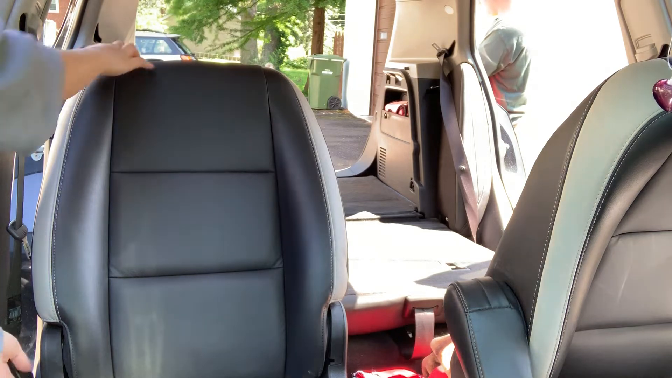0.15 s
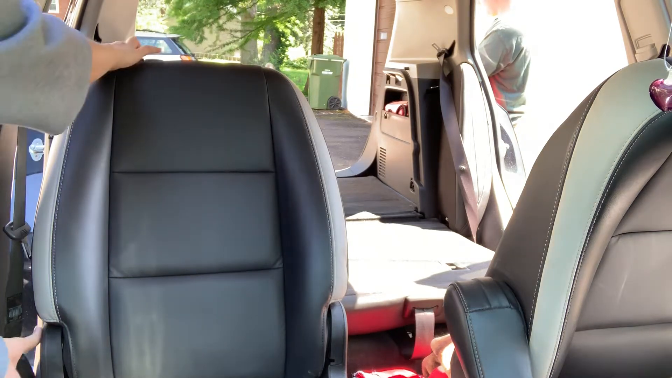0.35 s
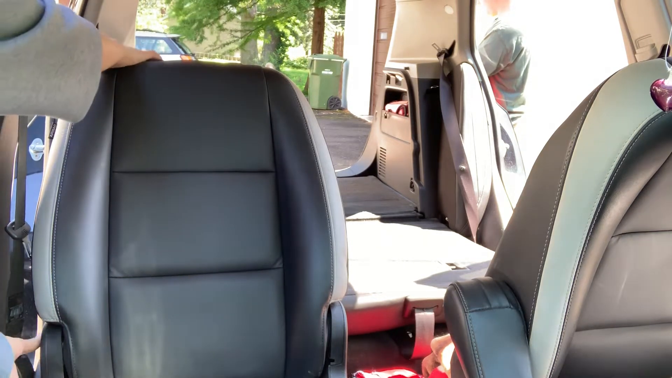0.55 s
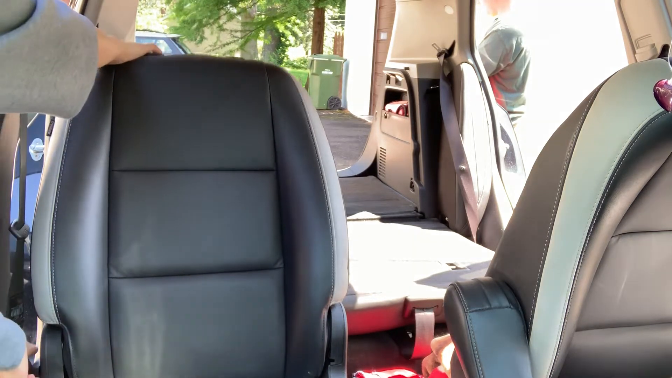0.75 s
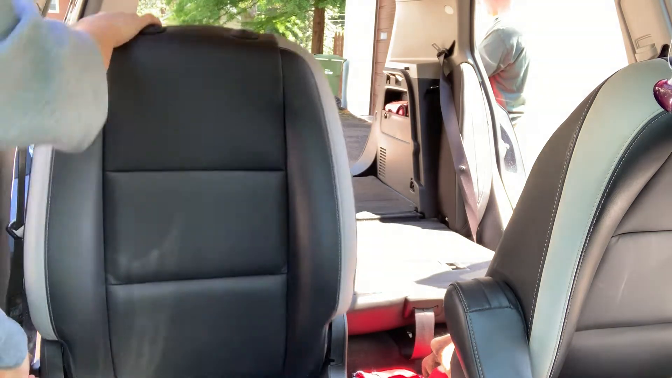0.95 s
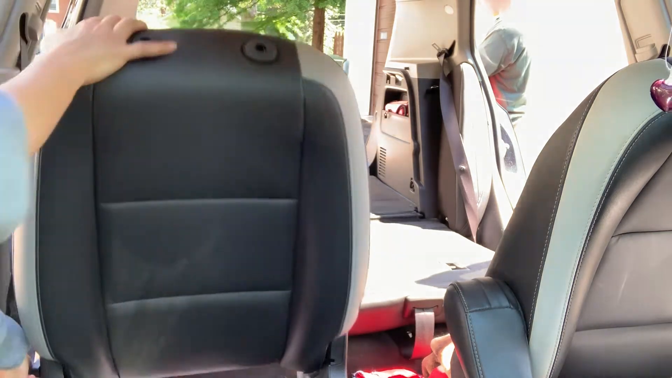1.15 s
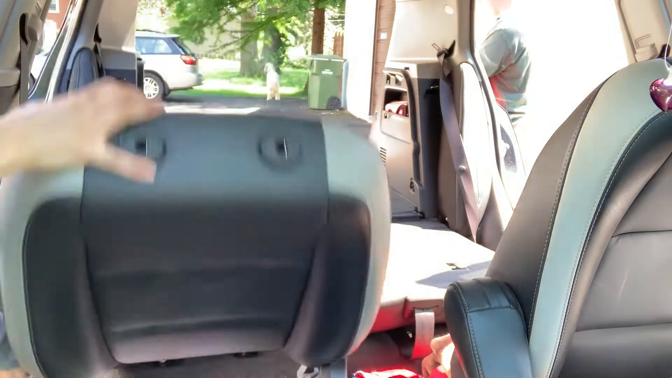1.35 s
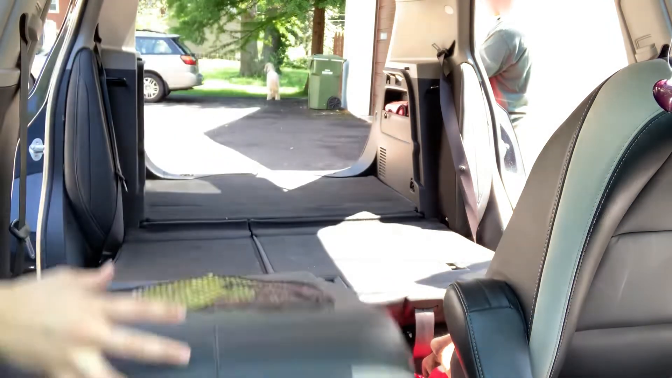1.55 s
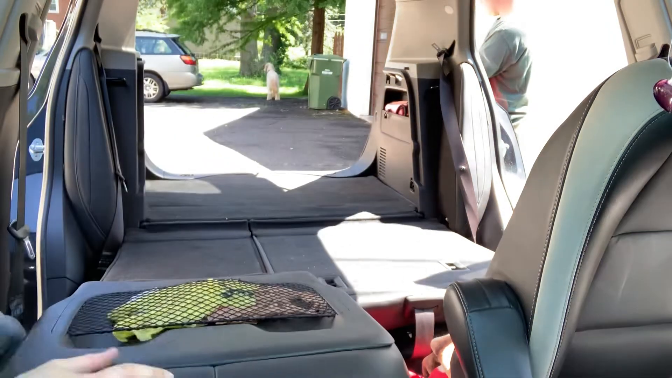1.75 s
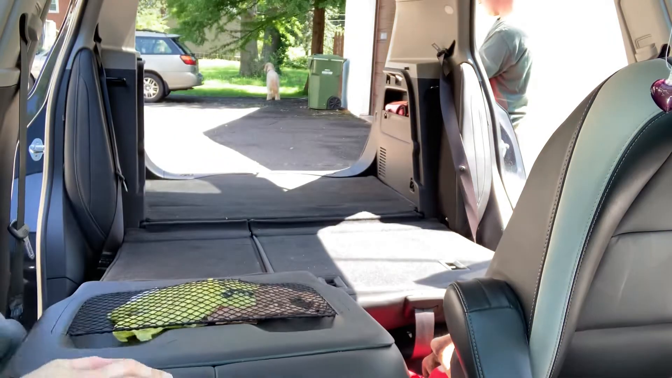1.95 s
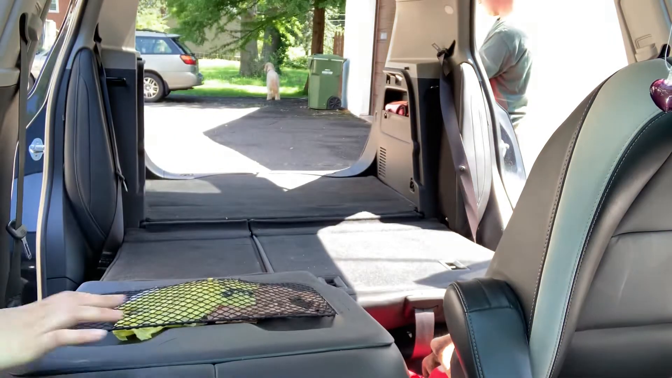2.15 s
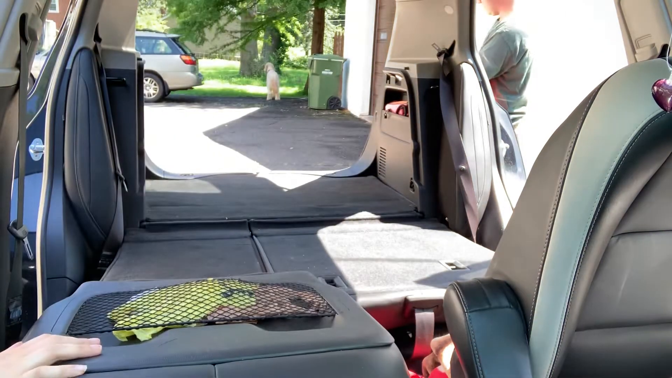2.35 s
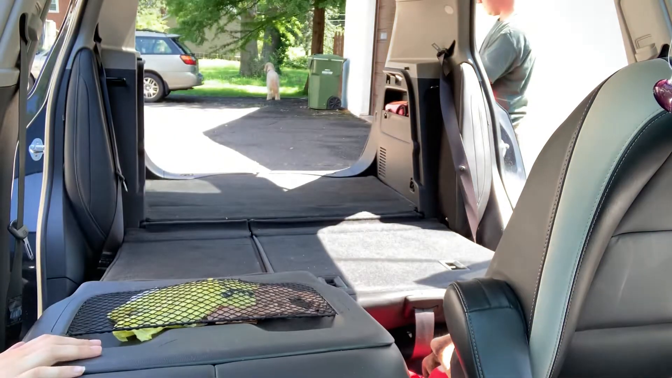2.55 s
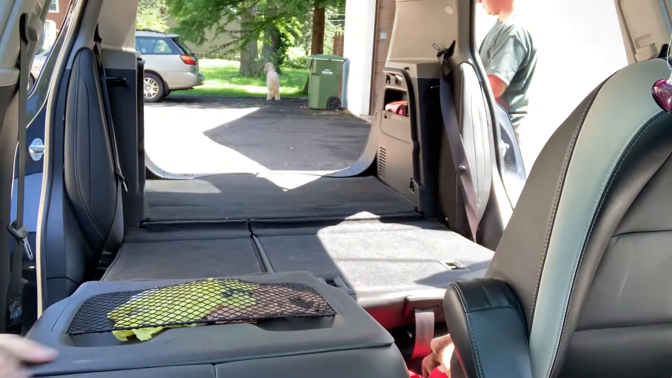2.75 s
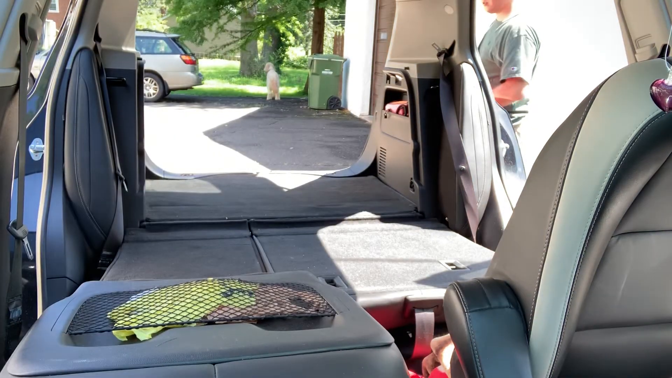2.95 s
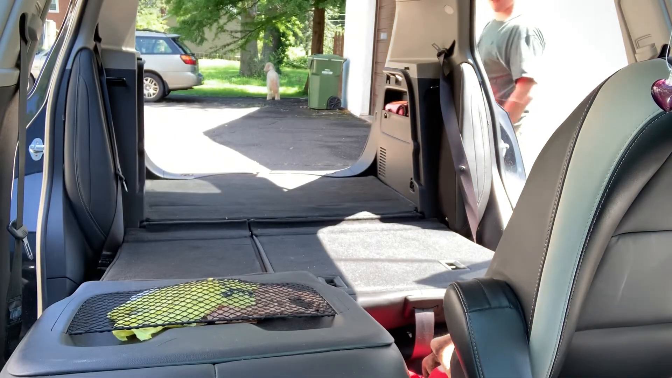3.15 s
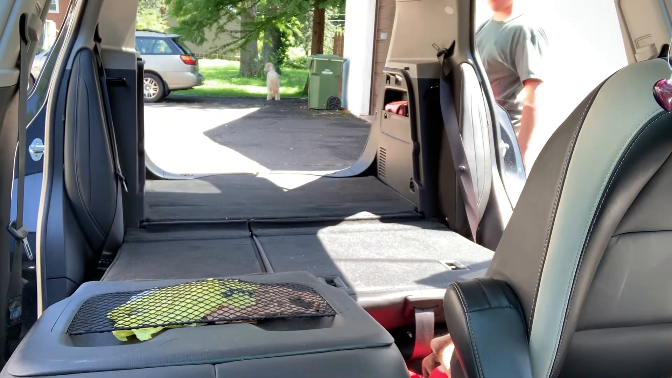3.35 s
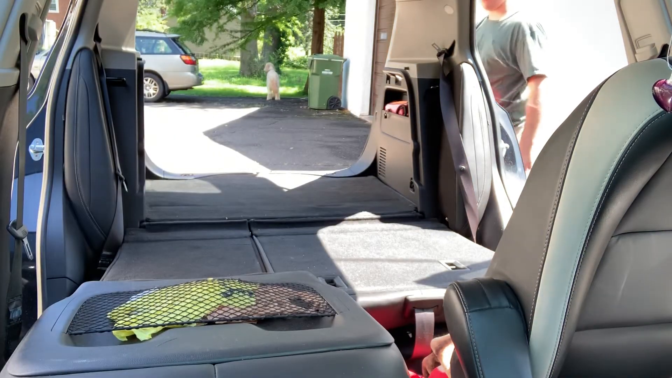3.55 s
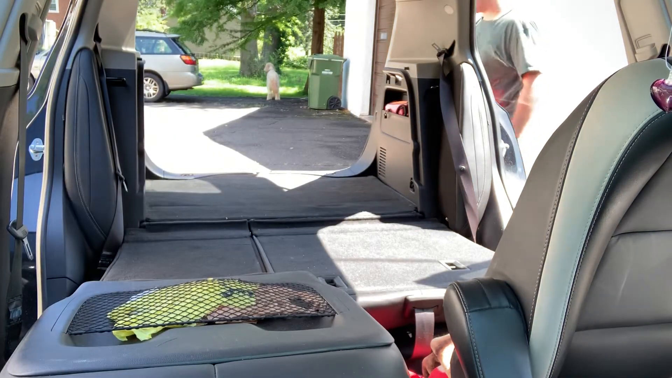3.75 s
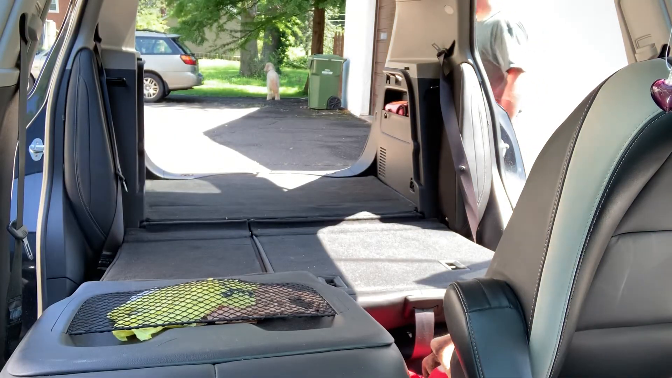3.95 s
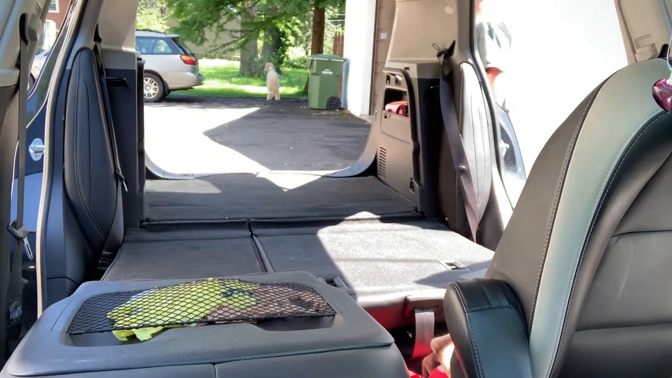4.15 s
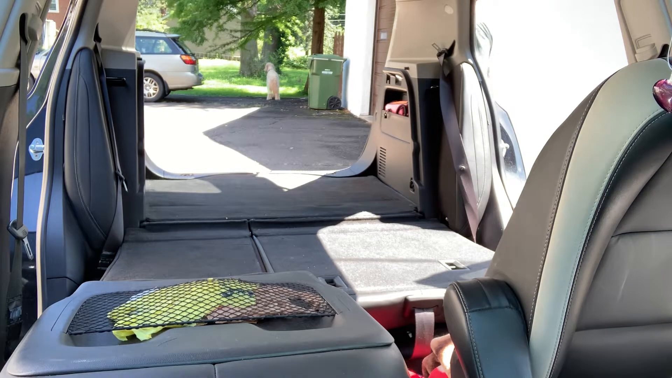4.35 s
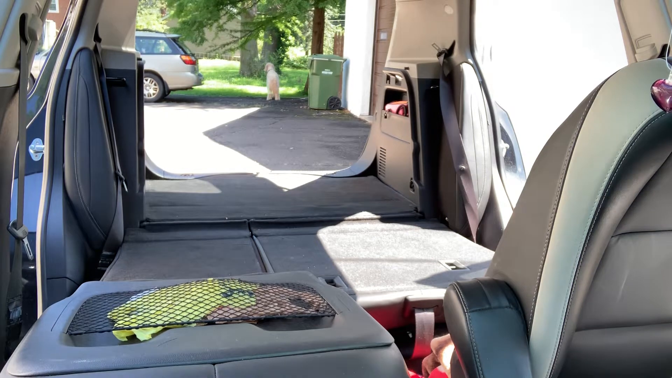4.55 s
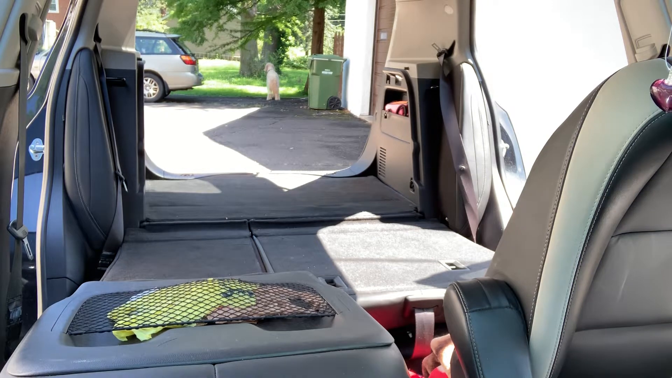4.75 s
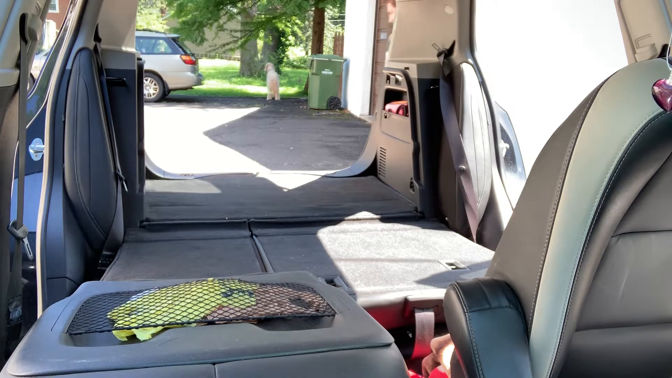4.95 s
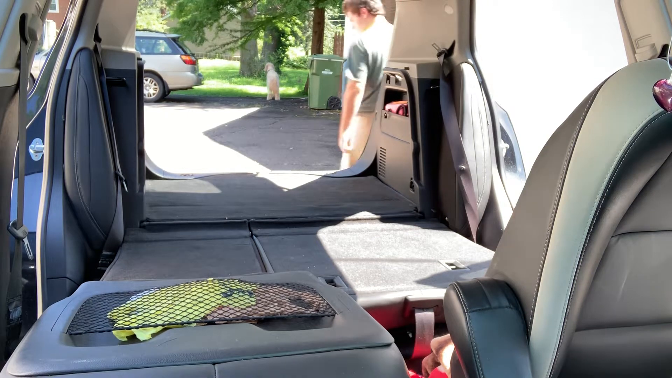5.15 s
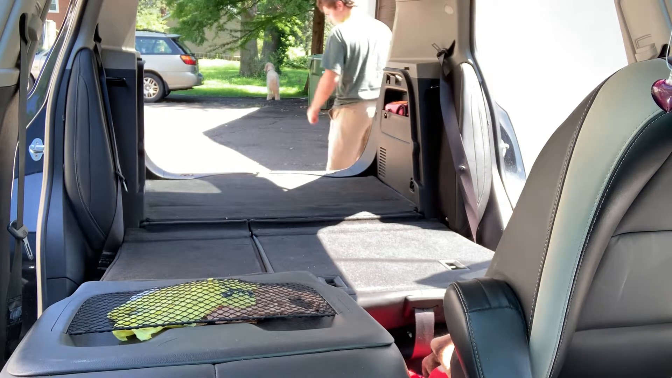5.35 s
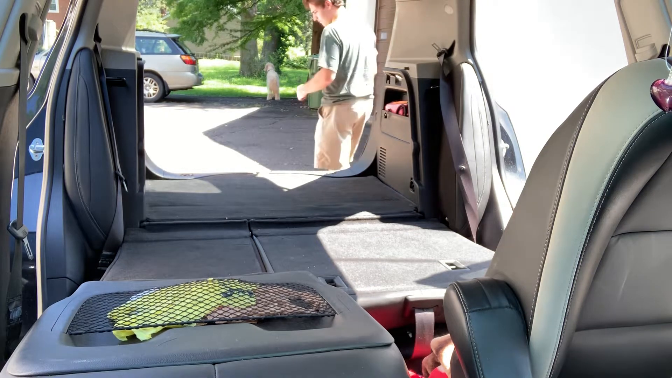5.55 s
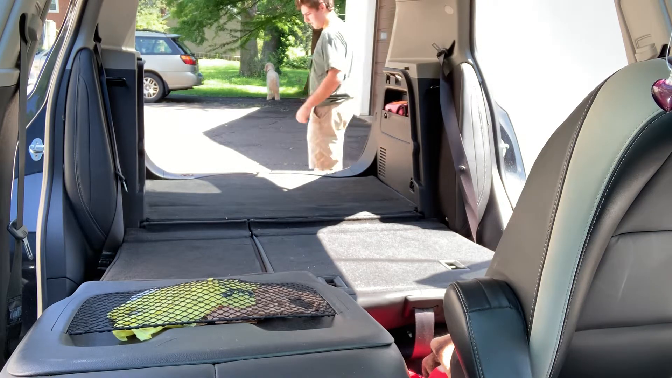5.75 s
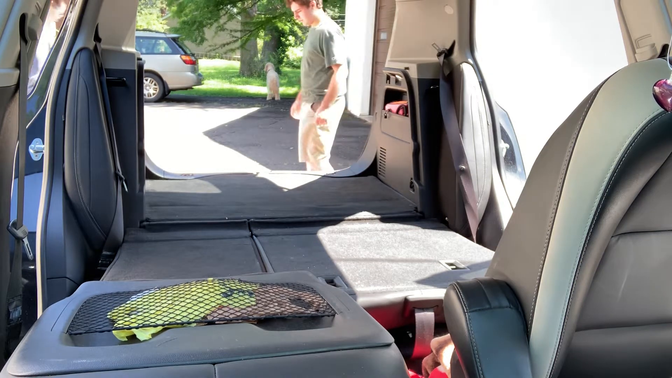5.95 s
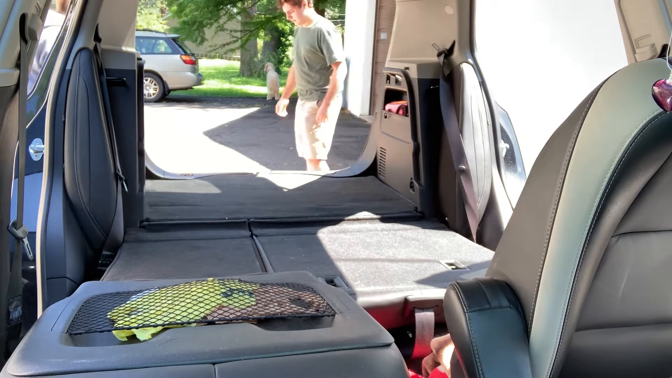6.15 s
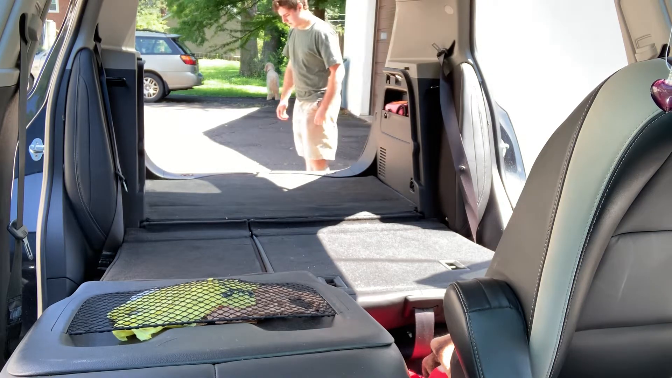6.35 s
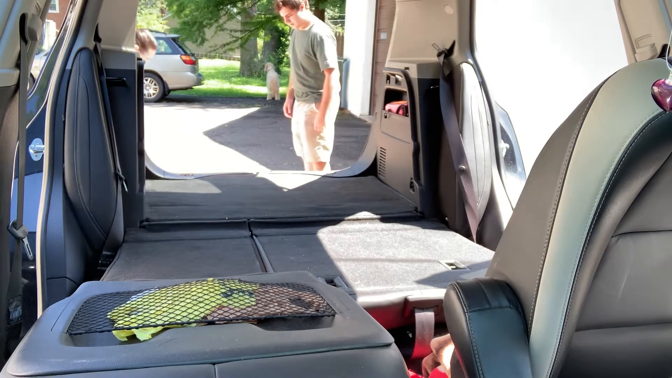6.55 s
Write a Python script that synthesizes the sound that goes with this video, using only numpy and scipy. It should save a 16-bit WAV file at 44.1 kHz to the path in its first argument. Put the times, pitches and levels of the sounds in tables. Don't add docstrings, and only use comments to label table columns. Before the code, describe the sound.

Inside a car with its doors open, a latch clicks and upholstery scuffs, a hollow knock frees the seatback, and it falls flat with a very loud, low padded thud, rattle and quick bounce. Small settling knocks follow, then light plastic taps and faint shoes on a drive. Cicadas wash steadily outside over a distant drone. Close stereo microphone in the cabin.

```python
import sys
import numpy as np
from scipy import signal
from scipy.fft import rfft, irfft, next_fast_len
from scipy.io import wavfile
from scipy.ndimage import uniform_filter1d, map_coordinates

SR = 44100
rng = np.random.default_rng(int(sys.argv[2]) if len(sys.argv) > 2 else 0)


def digitize_waveform(pressure):
    field = np.atleast_2d(pressure).T
    bounded = np.clip(field, -1, 1)
    quanta = np.round(bounded * 32767).astype(np.int16)
    wavfile.write(sys.argv[1], SR, quanta)


def invert_db(x):
    u = np.asarray(x, float) / 20
    return 10 ** u


N = 291147


def unit(x):
    return x / np.sqrt(np.mean(x ** 2) + 1e-20)


def along(points, hz):
    f, v = np.transpose(points)
    return np.interp(np.log(hz + 1), np.log(f + 1), v)


def curves(rows):
    s, *cols = np.transpose(rows)
    return [np.interp(np.arange(N) / SR, s, c) for c in cols]


def wobble(rate):
    knots = rng.standard_normal(int(N * rate / SR) + 4)
    return map_coordinates(knots, [np.arange(N) * rate / SR])


def filtered(x, response):
    m = next_fast_len(x.shape[-1] + 8192)
    spectrum = rfft(x, m) * response(np.fft.rfftfreq(m, 1 / SR))
    return irfft(spectrum, m)[..., :x.shape[-1]]


def modes(table):
    def response(f):
        total = 0
        for k, (centre, width, db) in enumerate(table):
            damping = 1j * f * width
            total = total + (-1) ** k * invert_db(db) * damping / (centre * centre - f * f + damping)
        return total
    return response


def rush(spectrum, grit_db=0, patchy_db=0):
    grains_db = grit_db * np.minimum(rng.exponential(1, N // 40 + 1), 3.5)
    grit = invert_db(grains_db).repeat(40)[:N]
    z = signal.stft(grit * rng.standard_normal((2, N)), nperseg=512)[2]
    field = uniform_filter1d(rng.standard_normal(z.shape[1:]), size=6, axis=0)
    field = uniform_filter1d(field, size=12, axis=1)
    pair = signal.istft(z * invert_db(patchy_db * unit(field)), nperseg=512)[1][:, :N]
    return unit(filtered(pair, lambda hz: invert_db(along(spectrum, hz)) * (hz > spectrum[0][0])))


def swells(rest_db, s, db, rise_s, fall_s):
    s, db, rise_s, fall_s = [np.reshape(column, (-1, 1)) for column in (s, db, rise_s, fall_s)]
    t = np.arange(0, N + 32, 32) / SR
    late = t - s
    steep = np.where(late < 0, -1 / rise_s, 1 / fall_s)
    power = invert_db(2 * db - 40 * late * steep).sum(axis=0)
    return np.sqrt(invert_db(2 * rest_db) + np.interp(np.arange(N) / SR, t, power))


# [t/s, peak level/dB, f/Hz]
PADDED_BLOWS = [(0.325, -25, 304), (0.331, -20.5, 161), (0.773, -16.5, 108), (0.787, -20.5, 158),
                (0.8, -30, 108), (0.814, -23, 138), (1.702, -16.5, 273), (1.734, -6.5, 135),
                (1.7498, -4, 135), (1.822, -12, 108), (1.845, -15, 270), (1.855, -14, 167),
                (1.868, -17.5, 163), (2.03, -28, 105), (2.137, -30, 137), (2.174, -36, 130),
                (2.224, -34, 300), (2.3902, -7.5, 119), (5.016, -39.5, 340), (5.193, -38.5, 315),
                (6.461, -38.5, 277)]
# [t/s, peak level/dB, f/Hz, t60/s]
PANEL_BLOWS = [
    (1.105, -11, 225, .024),
    (1.1152, -5.5, 105, .02),
    (1.128, -30, 250, .04),
    (1.7138, 6, 122, .027),
    (1.7246, -6.5, 255, .021),
    (2.232, -34, 290, .05),
    (1.766, -22, 90, .12),
    (2.3755, -28, 290, .12),
    (3.872, -27.5, 430, .011),
    (3.8902, -24, 400, .014),
]
# [f/Hz, width/Hz, level/dB]
FRAME_MODES = [(103, 13.4, 6), (147, 17.7, 8), (188, 30, 3.5), (315, 128, -10.5), (483, 27, -18),
               (560, 160, -27), (710, 134, -26.5), (1036, 120, -29.5), (1260, 370, -29)]


def knocks():
    foam_t60 = .035
    blow_delay = 70
    out, t = np.zeros((2, N + SR)), np.arange(SR // 4) / SR
    padded = [(*row, foam_t60) for row in PADDED_BLOWS]
    for s, db, hz, t60 in [*padded, *PANEL_BLOWS]:
        rise = 1 - np.exp(-t * hz * 1.66)
        turns = hz * (t + 0.00094 * (1 - np.exp(-t / 0.0044)))
        swing = -rise * invert_db(-60 * t / t60) * np.sin(2 * np.pi * (turns + [[0], [-1 / 4]]))
        start = round(s * SR) + blow_delay
        out[:, start:start + len(t)] += invert_db(db + 6) * swing
    blows = out[:, :N]
    return blows + invert_db(-9.5) * filtered(blows, modes(FRAME_MODES))


# [t/s, peak level/dB, rise/s per 20 dB]
FRAME_RATTLES = [
    (.79, -41.5, .02),
    (1.104, -48, .008),
    (1.703, -28, .003),
    (1.728, -17.5, .022),
    (1.775, -31, .05),
    (1.85, -27, .06),
    (1.46, -49, .05),
    (2.228, -41, .012),
]


def shudder():
    level = swells(-120, *np.transpose(FRAME_RATTLES), .068)
    colour = [(150, -12.5), (300, -0.5), (500, 8.5), (680, 10.5), (900, 4.5), (1400, -3.5),
              (2200, -6), (4000, -25)]
    chatter = unit(filtered(rush(colour, grit_db=3.5), modes(FRAME_MODES)))
    return invert_db(-1.5) * level * chatter


# [t/s, peak level/dB, centre f/Hz, t60/s, treble level/dB]
LATCH_CLICKS = [
    (0.325, -34.5, 1130, .035, -18),
    (0.773, -45, 880, .032, -10),
    (0.799, -45, 802, .04, -12),
    (0.835, -51, 1140, .052, -8),
    (1.1, -34, 1020, .045, -10),
    (1.45, -44.5, 980, .088, -12),
    (1.647, -51, 1130, .12, 7),
]
# [t/s, peak level/dB, centre f/Hz, t60/s, treble level/dB]
STOP_HITS = [(1.702, -27, 1200, .06, -17), (1.724, -26, 1280, .06, -14), (1.732, -23, 1030, .04, -16),
             (1.751, -33, 1340, .11, -3), (1.82, -39, 1140, .047, -13), (1.831, -33, 680, .06, -14),
             (1.844, -33, 700, .05, -16), (2.036, -41.5, 810, .028, -16), (2.223, -42, 1330, .04, -16),
             (2.264, -56, 802, .02, 9), (2.373, -42, 1220, .081, -11)]
# [t/s, peak level/dB, centre f/Hz, t60/s, treble level/dB]
TRIM_TOUCHES = [(2.841, -43, 1540, .061, -3), (2.884, -41.5, 2620, .12, -3), (3.355, -34, 1250, .029, -24),
                (3.363, -37.5, 2100, .051, -17), (3.372, -43, 1610, .071, -14),
                (3.613, -50, 1000, .069, -14), (3.872, -45, 991, .025, -8), (3.89, -36.5, 2300, .04, -6),
                (3.896, -39, 1500, .028, -6), (4.334, -57, 2200, .012, 17), (4.869, -48, 1550, .03, 4),
                (5.195, -42, 1420, .017, -20), (6.461, -50, 945, .04, 9)]
# [t/s, peak level/dB, centre f/Hz, t60/s]
SHOE_STEPS = [
    (4.354, -46.5, 2200, .057),
    (5.991, -49, 2700, .05),
    (6.034, -47, 2300, .06),
    (6.238, -44, 1500, .15),
    (6.297, -46.5, 2000, .06),
    (6.41, -45, 2300, .09),
    (6.417, -45, 1750, .07),
    (6.433, -48, 1800, .06),
]


def contacts():
    drag_s, drag_length_s, drag_db, drag_hz, drag_t60 = 6.2, .1, -51.5, 1550, .13
    grit = []
    for when, size, pitch in rng.random((12, 3)):
        hz = drag_hz * (1 + .3 * (pitch - .5))
        grit.append((drag_s + drag_length_s * when, drag_db + 6 * (size - .5), hz, drag_t60))
    shoes = [(*row, -21) for row in [*SHOE_STEPS, *grit]]
    groups = [(LATCH_CLICKS, 3), (STOP_HITS, -2.5), (TRIM_TOUCHES, -3), (shoes, -4.5)]
    return [(*row, pan_db) for rows, pan_db in groups for row in rows]


# [f/Hz, level/dB]
CRACK_COLOUR = [(2400, -29), (3700, 6), (5500, 5), (8000, 1), (11000, -1), (14000, -9), (15700, -26)]


def ticks():
    out, t = np.zeros((2, 2, N + SR)), np.arange(SR // 6) / SR
    for s, db, hz, t60, treble_db, pan_db in contacts():
        first_touch = 1 + 1.5 * np.exp(-t / .0015)
        puff, snap = rng.standard_normal((2, 2, len(t))) * first_touch
        ring = modes([(.52 * hz, .3 * hz, -8), (hz, .4 * hz, 0), (1.5 * hz, .4 * hz, -9)])
        body = unit(filtered(puff, lambda f: ring(f) / (1 + 1j * f / (3.8 * hz))))
        crack = unit(filtered(snap, lambda f: invert_db(along(CRACK_COLOUR, f)) * (f > 2200) * (f < 15700)))
        burst = body * invert_db(-60 * t / t60) + invert_db(treble_db) * crack * invert_db(-60 * t / (0.74 * t60))
        burst = invert_db(db - 4) * (1 - np.exp(-t / .0004)) * burst
        sides = invert_db([pan_db / 2, -pan_db / 2])[:, None, None]
        start = round(s * SR)
        out[..., start:start + len(t)] += sides * burst
    return out[..., :N]


# [t/s, peak level/dB, f/Hz, t60/s]
STRUCK_RINGS = [(.326, -50, 2400, .02), (.327, -44, 1500, .04), (.62, -58, 15300, .03),
                (1.0995, -46, 3800, .05), (1.25, -58, 15200, .03), (1.1, -47, 3400, .05),
                (1.1, -38, 1010, .05), (1.1035, -41, 1450, .03), (1.104, -47, 2300, .02),
                (1.7015, -30, 1200, .04), (1.7035, -40, 2600, .05), (1.704, -44, 4000, .015),
                (1.709, -25, 540, .04), (1.713, -35, 1650, .03), (1.7235, -27, 1310, .05),
                (1.7245, -34, 3980, .04), (1.7255, -39, 3300, .03), (1.726, -41, 4500, .03),
                (1.726, -24, 445, .05), (1.727, -34, 2100, .03), (1.728, -26, 560, .05),
                (1.729, -39, 2830, .025), (1.733, -32, 1020, .05), (1.752, -41, 4100, .02),
                (1.756, -43, 5300, .04), (1.76, -37, 1150, .03), (1.82, -39, 1200, .05),
                (1.833, -45, 2600, .025), (1.835, -45, 3500, .03), (1.836, -31, 700, .04),
                (1.845, -33, 620, .04), (1.845, -40, 1500, .03), (1.847, -44, 3600, .025),
                (1.85, -45, 2600, .02),
                (2.223, -45, 1300, .04), (2.228, -40, 640, .05), (2.373, -46, 1550, .05),
              (2.843, -48, 1500, .03), (2.853, -48, 3700, .02), (2.876, -48, 1400, .03),
              (2.8855, -43, 2550, .015), (2.892, -47, 2800, .012), (.62, -58, 15300, .03),
              (1.25, -58, 15200, .03), (2.264, -49, 13000, .004), (2.376, -52, 14800, .005),
              (3.358, -45, 2500, .02), (3.366, -45, 800, .03), (3.38, -47, 1800, .03),
              (3.8722, -46, 2700, .012), (3.8902, -33, 5750, .009), (3.9, -47, 2200, .03),
              (4.334, -50, 13000, .004), (4.334, -52, 15000, .004), (6.465, -50, 14800, .006),
              (3.8905, -39, 2600, .01), (4.869, -48, 2200, .015), (6.248, -45, 1490, .03),
              (6.28, -46, 1500, .03)]


def rings():
    out, t = np.zeros((2, N + SR)), np.arange(SR // 8) / SR
    for s, db, hz, t60 in STRUCK_RINGS:
        swing = np.sin(2 * np.pi * (hz * t + [[0], [-1 / 4]]))
        start = round(s * SR)
        out[:, start:start + len(t)] += invert_db(db - 60 * t / t60) * (1 - np.exp(-t / .0005)) * swing
    return out[:, :N]


# [t/s, f/Hz]
BODY_ROCKING = [
    (1.8, 44.215),
    (1.83, 45.5),
    (1.9, 46.6),
]
# [t/s, level/dB]
BODY_SWAY = [
    (1.7, -38),
    (1.738, -12.5),
    (1.765, -19),
    (1.812, -11.5),
    (1.845, -24),
    (1.88, -16),
    (1.968, -19.5),
    (1.99, -30),
    (2.19, -39),
]
# [t/s, peak level/dB, rise/s, fall/s per 20 dB]
BODY_JOLTS = [(.33, -34.5, .25, .07), (.4, -35, .1, .4), (.7, -41, .4, .2), (.83, -30.5, .1, .04),
              (.96, -33.5, .25, .02), (1.01, -33, .06, .07), (1.157, -21, .045, .055),
              (1.23, -29, .08, .06), (1.56, -38, .15, .13), (2.2, -31, .03, .05), (2.35, -35, .15, .05),
              (2.425, -30, .04, .05), (2.462, -23, .06, .05), (2.63, -35, .12, .04)]
# [t/s, peak level/dB]
TRAFFIC_SWELLS = [(.11, -39), (2.81, -40), (3.06, -39), (3.27, -40), (3.48, -41), (3.7, -33), (3.9, -40),
                  (4.26, -35.5), (4.48, -41), (4.59, -35.5), (4.85, -36), (5.1, -40), (5.29, -35.5),
                  (5.7, -39.5), (5.95, -41), (6.16, -37), (6.33, -39), (6.54, -35)]
# [f/Hz, width/Hz, level/dB]
CABIN_MODES = [(48.5, 15.5, -1), (62.6, 27, 2), (28.3, 35, 1)]


def boom():
    t = np.arange(N) / SR
    cabin = modes(CABIN_MODES)
    air = filtered(rng.standard_normal((2, N)), lambda f: cabin(f) / (1 + (f / 95) ** 4))
    swell = np.abs(signal.hilbert(air, next_fast_len(N))[:, :N])
    evened = air / (swell + 0.12 * np.std(air)) ** 0.82
    steadier = filtered(evened, lambda f: 1 / (1 + (f / 110) ** 6))
    swing = np.sqrt(2) * np.sin(2 * np.pi * np.cumsum(curves(BODY_ROCKING)[0]) / SR) * [[1], [0]]
    share = curves([(1.68, 0), (1.71, .9), (1.99, .9), (2.04, 0)])[0]
    sway = invert_db(curves(BODY_SWAY)[0]) * (t > BODY_SWAY[0][0]) * (t < BODY_SWAY[-1][0])
    resting = swells(-47, *np.transpose(TRAFFIC_SWELLS), .15, .12)
    handled = swells(-120, *np.transpose(BODY_JOLTS)) + sway
    return np.hypot(resting, handled) * (share * swing + np.sqrt(1 - share ** 2) * unit(steadier))


# [t/s of the peak, rise/s per 20 dB, hiss level/dB, scuff level/dB]
CLOTH_STROKES = [(.327, .006, -58, -47), (.79, .03, -72, -43), (.86, .1, -64, -58), (1.102, .005, -62, -40),
                 (1.62, .55, -54, -47), (1.65, .1, -46.5, -48), (1.705, .004, -58, -32),
                 (1.727, .025, -54, -23), (1.757, .03, -44, -42), (1.842, .04, -50, -37),
                 (1.86, .03, -53, -41), (2.15, .07, -59, -48), (2.23, .03, -80, -55),
                 (2.375, .01, -68, -52), (2.89, .17, -61, -40), (3.358, .006, -80, -45),
                 (3.4, .1, -73, -46), (3.892, .008, -68, -43), (3.93, .1, -65, -44), (4.15, .1, -76, -60),
                 (4.56, .3, -85, -49), (4.8, .2, -76, -53), (5.75, .3, -79, -60), (6.25, .2, -82, -49),
                 (6.467, .02, -59, -60)]
# [t/s, hiss level/dB, scuff level/dB]
CLOTH_REST = [
    (0, -69, -57),
    (1.0, -70, -64),
    (1.9, -72, -70),
    (2.6, -78, -62),
    (3.0, -75, -54),
    (4.2, -81, -52),
    (6.6, -83, -52),
]
# [f/Hz, level/dB]
HISS_COLOUR = [(1500, -23), (3000, -4), (6000, -5), (9000, -2.5), (12000, -2), (15800, -10)]
# [f/Hz, level/dB]
SCUFF_COLOUR = [(300, 10.5), (700, 3.5), (1100, 4), (1500, 3), (2000, -6), (2600, 3), (4000, -10),
                (8000, -24), (14500, -23.5)]


def rubbing():
    away_s, away_top_hz = 3.0, 14200
    soften = lambda hz: hz < away_top_hz
    s, rise_s, hiss_db, scuff_db = np.transpose(CLOTH_STROKES)
    rest_hiss_db, rest_scuff_db = curves(CLOTH_REST)
    hiss = invert_db(2.5) * rush(HISS_COLOUR, grit_db=1.5, patchy_db=1.2)
    dull = filtered(hiss, soften)
    hiss = np.where(np.arange(N) < away_s * SR, hiss, dull)
    scuff = invert_db(-5.5) * filtered(rush(SCUFF_COLOUR, grit_db=2), soften)
    hiss_level = swells(-120, s, hiss_db - 1, rise_s, .06)
    scuff_level = swells(rest_scuff_db, s, scuff_db, rise_s, .05)
    return invert_db(rest_hiss_db) * dull + hiss_level * hiss + scuff_level * scuff


# [t/s, level/dB]
CHORUS_LEVEL = [
    (0, -53),
    (.37, -53.5),
    (.94, -56.5),
    (1.47, -57),
    (1.69, -61),
    (1.82, -58),
    (3.0, -56),
    (3.7, -54),
    (6.6, -55),
]
# [f/Hz, level/dB]
CICADA_COLOUR = [(1800, -26), (2300, -11.5), (3000, -2), (4000, 2.5), (5000, 1.5), (6000, 1.5),
                 (7000, -3.5), (8500, -24.5), (10000, -63)]


def cicadas():
    level = invert_db(curves(CHORUS_LEVEL)[0] + 3.5 + .4 * wobble(2.9))
    return level * rush(CICADA_COLOUR, grit_db=0.48, patchy_db=1.43)


# [t/s of the middle, level/dB]
KATYDID_RASPS = [(.181, -59), (.844, -68), (1.075, -60), (1.3, -70), (1.975, -66), (2.427, -69),
                 (2.65, -67), (3.049, -66), (3.322, -63), (3.533, -62), (3.723, -61), (4.168, -62),
                 (4.372, -64), (4.599, -64), (4.802, -63), (5.01, -61), (5.272, -62), (5.534, -62.5),
                 (5.794, -60), (6.025, -67)]


def katydid():
    t = np.arange(N) / SR
    rasps = sum(invert_db(db) * np.exp(-((t - s) / .019) ** 2) for s, db in KATYDID_RASPS)
    teeth = 1 + 0.38 * np.cos(2 * np.pi * 225 * t)
    return rasps * teeth * rush([(9400, -21), (9750, 21), (10050, 26), (10350, -7), (10800, -72)])


def tree_cricket():
    t = np.arange(N) / SR
    pulse = np.cos(np.pi * 13.3 * (t - 4.655)) ** 2
    trill = rush([(2600, -25), (2780, 10), (2900, 9), (3020, -4), (3200, -57)])
    return invert_db(4 * wobble(1.6)) * invert_db(-66) * pulse ** 2.2 * trill


# [f/Hz, level/dB]
LEAF_COLOUR = [(5500, -11), (7000, 6), (8000, 3.5), (9000, -2), (10000, -4.5), (11000, -18), (13000, -49),
               (15800, -60)]


def leaves():
    breeze_db, drop_db_per_s = -59, 1.15
    level = invert_db(breeze_db - drop_db_per_s * np.arange(N) / SR + 4.0)
    return level * rush(LEAF_COLOUR, grit_db=.4, patchy_db=0.86)


# [f/Hz, level/dB]
DRONE_COLOUR = [(41, -56), (70, 8.5), (87, -7), (144, -5), (183, -11), (257, -8.5), (472, -19),
                (580, -19.5), (746, -30.5), (815, -23), (1450, -30.5), (2400, -37), (3120, -64),
                (5280, -120)]
# [t/s, level/dB]
CAVITY_LEVEL = [
    (0, 1),
    (.6, 1),
    (1.2, -20),
    (1.9, 0),
    (2.6, -14),
    (4, -2),
    (5, -20),
    (6.6, -24),
]


def drone():
    lift_db, peak_s, span_s = 4.5, 1.5, .9
    drone_db = -50 + lift_db * np.exp(-((np.arange(N) / SR - peak_s) / span_s) ** 2)
    rumble = invert_db(drone_db + 3.5) * rush(DRONE_COLOUR, patchy_db=0.7)
    cavity = filtered(rumble, modes([(135, 60, 0)]))
    return rumble + invert_db(curves(CAVITY_LEVEL)[0]) * cavity


# [t/s, hum level/dB]
ENGINE_LEVEL = [
    (3.5, -74),
    (3.9, -55),
    (4.3, -53.5),
    (4.7, -53),
    (5.1, -55),
    (5.45, -58),
    (6, -92),
]


def engine():
    note = [(215, -25), (238, 2), (255, 4), (275, 0), (300, -25), (400, -90)]  # f/Hz, level/dB
    return invert_db(curves(ENGINE_LEVEL)[0]) * rush(note, patchy_db=2)


# [f/Hz, likeness 0-1]
PORT_LIKENESS = [(60, .99), (170, .96), (300, .8), (500, .62), (1400, .68), (2200, .45), (3500, .5),
                 (5000, .28), (6400, .45), (7200, .8), (8200, .97), (9300, .995), (15000, .998)]
# [f/Hz, phase/rad]
PORT_PHASE = [(20, 0), (170, .4), (860, 1.5), (1550, 3.1), (2900, 3.8), (3600, 3.2), (5000, 2.2),
              (8300, 2.45), (9400, 2.1), (16000, 2.3)]
# [f/Hz, L-R level/dB]
PORT_BALANCE = [(60, -1.1), (400, -.5), (700, -1), (1290, -2.3), (2380, -1.8), (4400, 0), (15000, -.1)]


def ports(left, right):
    lag = 18
    turn = lambda hz: np.arccos(np.clip(along(PORT_LIKENESS, hz), -1, 1)) / 2
    lead = lambda hz: np.pi * hz * lag / SR - along(PORT_PHASE, hz) / 2
    half = lambda hz: invert_db(along(PORT_BALANCE, hz) / 2) * np.exp(1j * lead(hz))
    left = filtered(left, lambda hz: half(hz) * [np.cos(turn(hz)), np.sin(turn(hz))])
    right = filtered(right, lambda hz: [np.cos(turn(hz)), -np.sin(turn(hz))] / half(hz))
    return np.array([left.sum(axis=0), right.sum(axis=0)])


def scene():
    seat = knocks() + shudder() + rings() + boom() + rubbing()
    outside = cicadas() + katydid() + tree_cricket() + leaves() + drone() + engine()
    centre = seat + outside
    left, right = ticks()
    return ports(centre + left, centre + right)


def band_limit(x):
    return signal.sosfilt(signal.butter(12, 15760, fs=SR, output="sos"), x)


def record(dry):
    held = dry / (1 + np.abs(dry / 1.05) ** 8) ** (1 / 8)
    return band_limit(held)


dry = scene()
out = record(dry)
digitize_waveform(out)
```